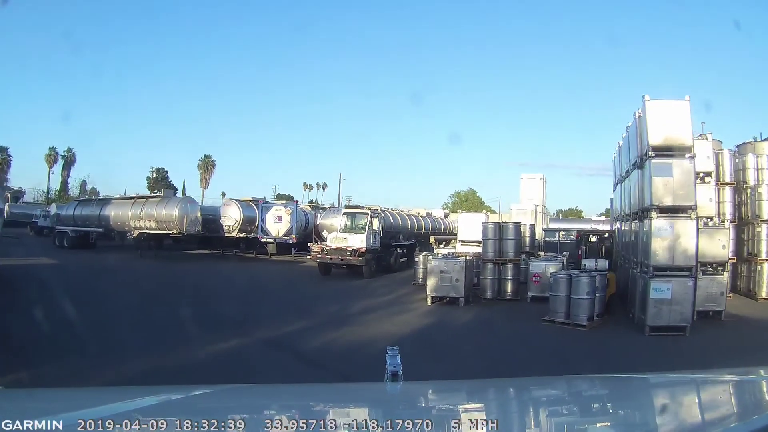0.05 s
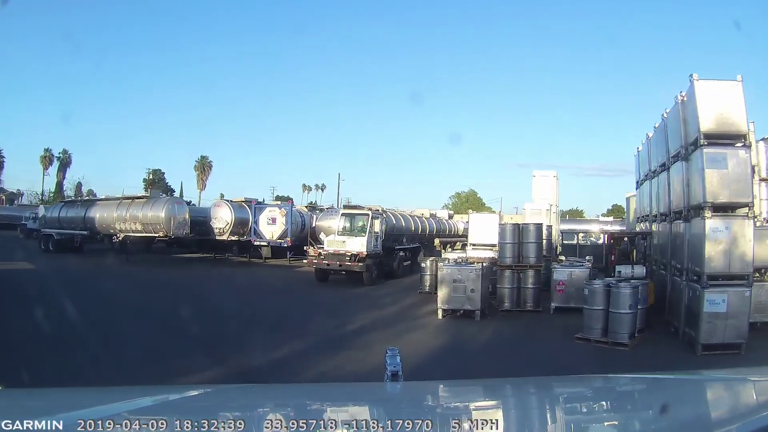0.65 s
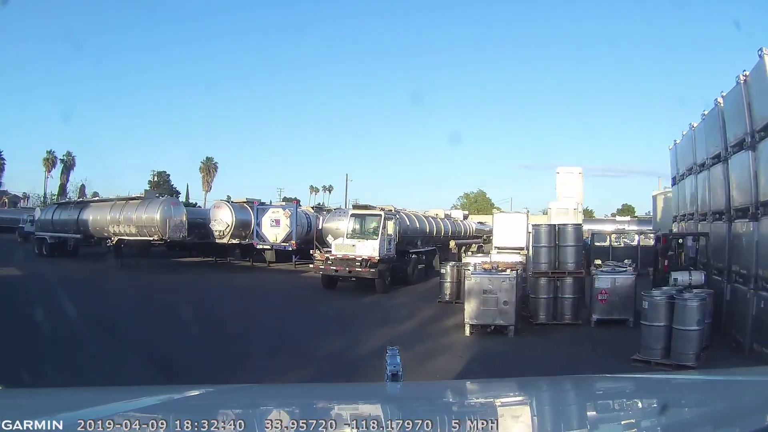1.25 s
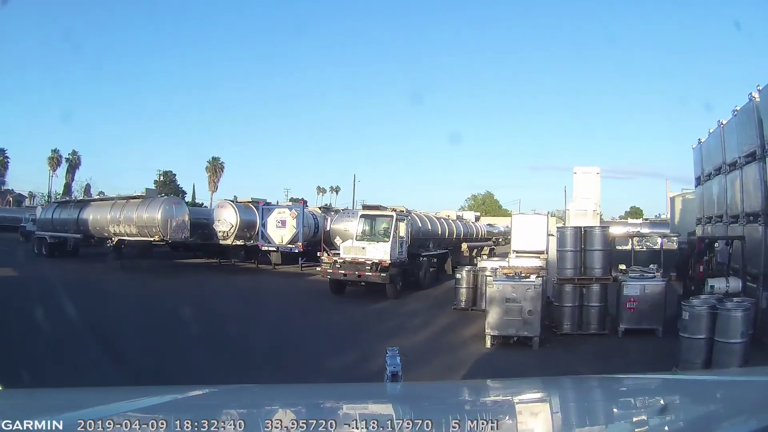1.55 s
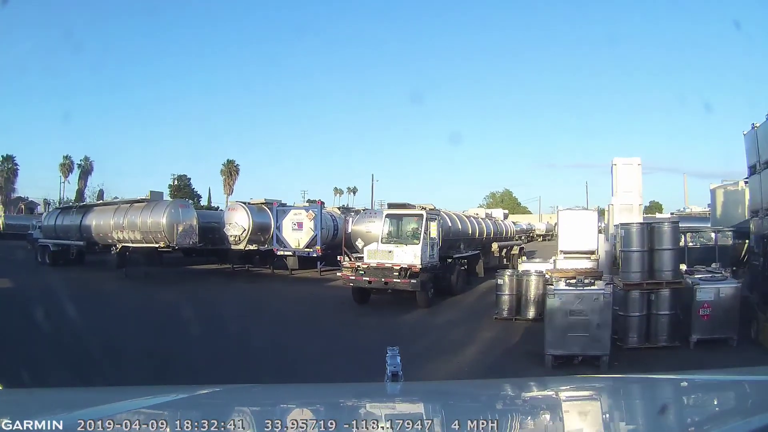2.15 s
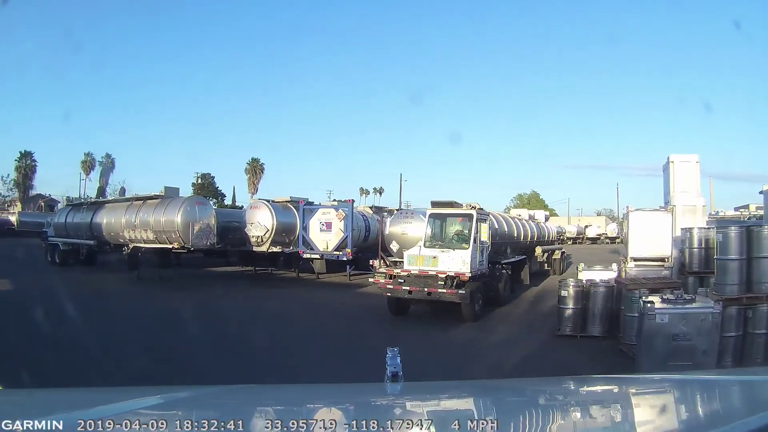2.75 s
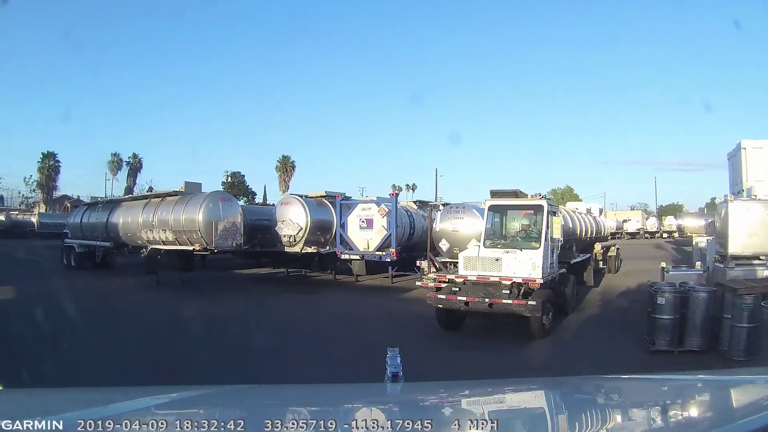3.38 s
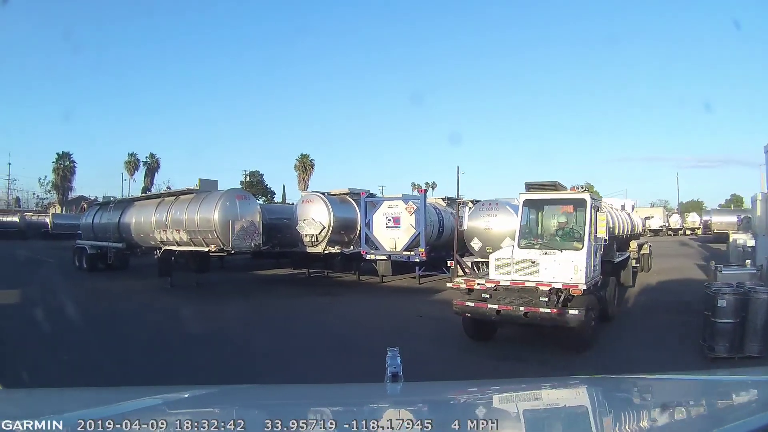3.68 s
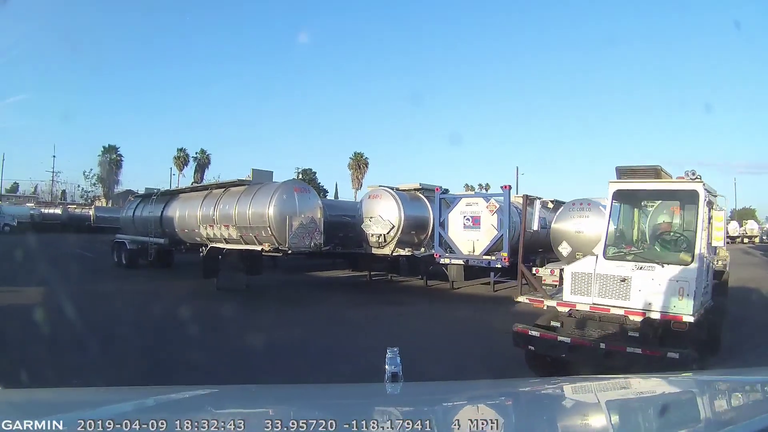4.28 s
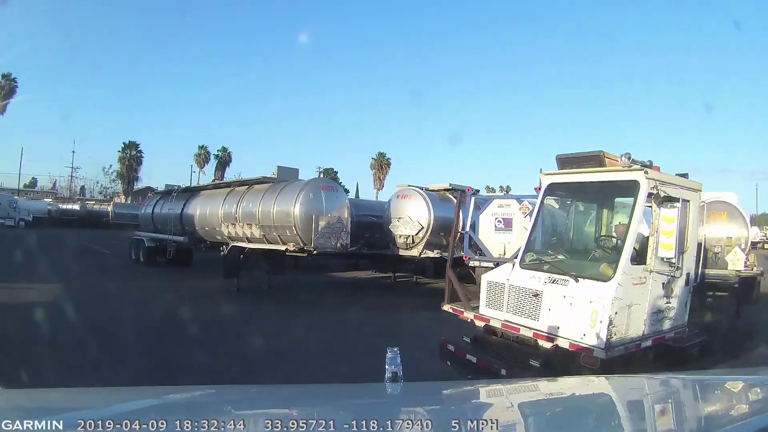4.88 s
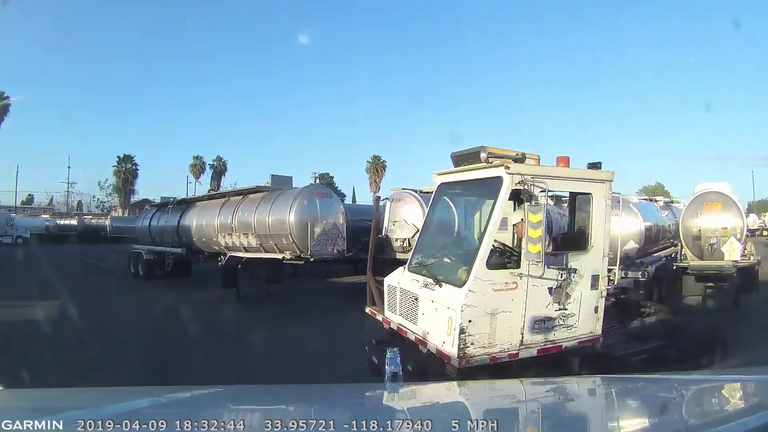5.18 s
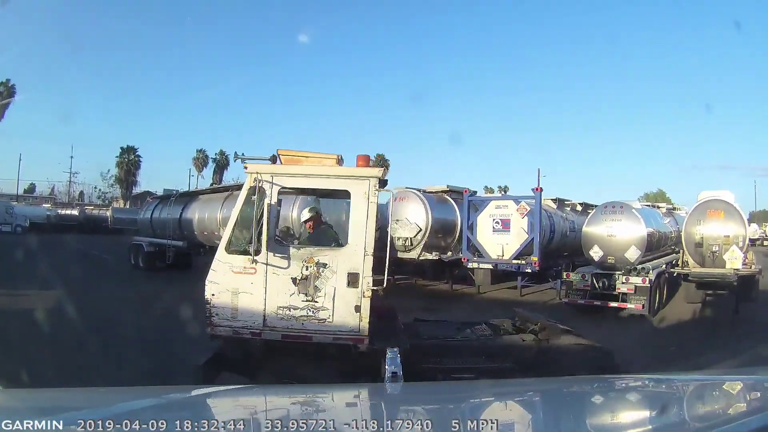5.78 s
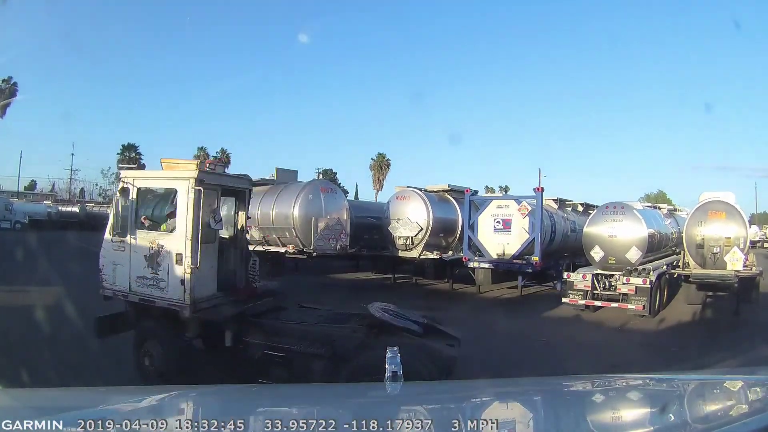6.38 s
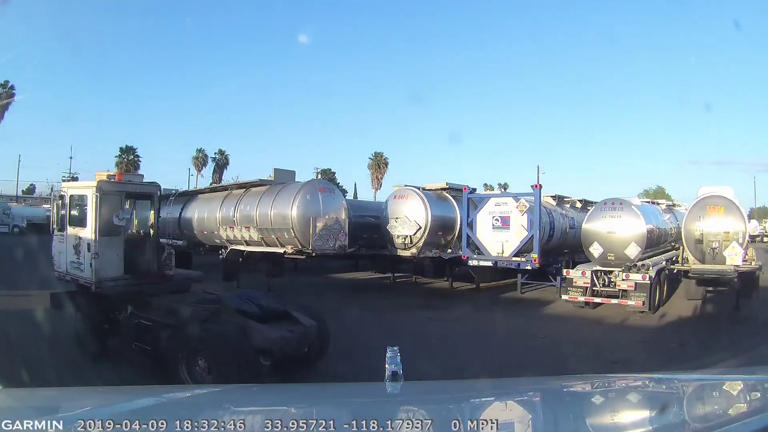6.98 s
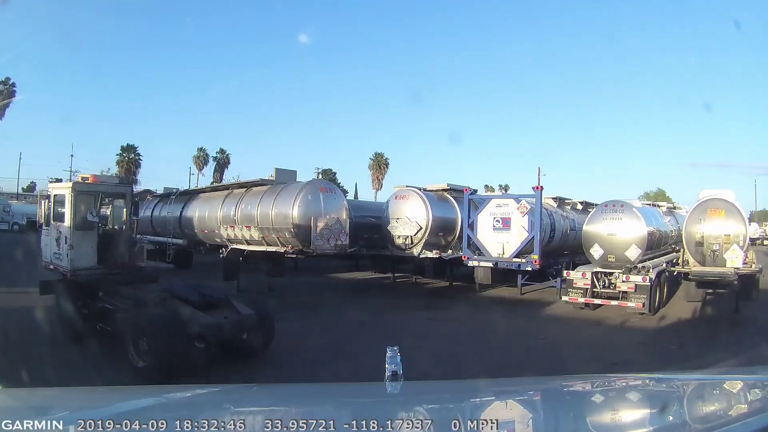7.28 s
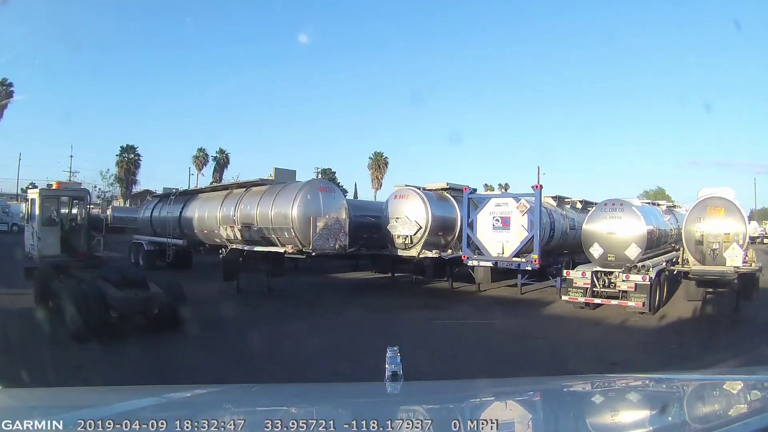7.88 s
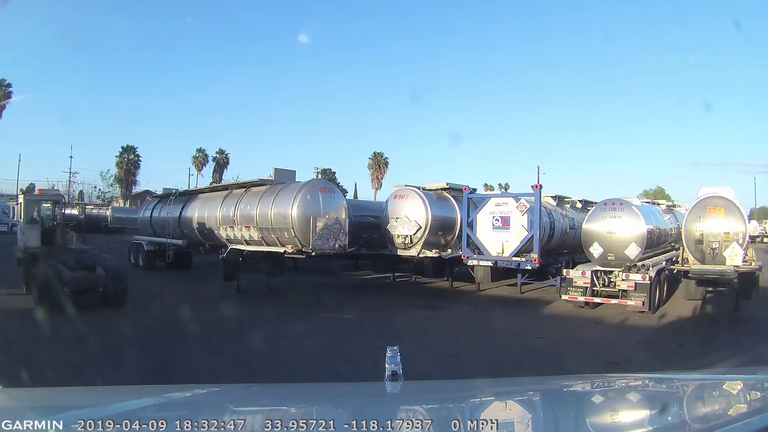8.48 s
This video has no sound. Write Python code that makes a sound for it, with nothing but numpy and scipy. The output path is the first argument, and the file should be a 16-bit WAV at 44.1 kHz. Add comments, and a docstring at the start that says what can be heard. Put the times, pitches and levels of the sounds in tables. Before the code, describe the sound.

Inside an idling diesel truck, a turn signal ticks while the cab rattles and swelling air hiss builds to a hard knock.

```python
"""Inside the cab of a diesel truck rolling at idle through a yard. Engine firings drive the cab's air,
an accessory whines, and the turn signal's relay ticks as its armature strikes and rings the housing.
The cab lurches on its mounts over a dip and its fittings rattle. Air hisses from the suspension valve,
swelling through a hard knock that rings the cab's shell and stopping shortly after it.
A yard tractor's exhaust hums past outside, and two softer thuds follow as the truck stops."""
import sys
import numpy as np
from scipy import signal
from scipy.fft import rfft, irfft, next_fast_len
from scipy.io import wavfile
from scipy.ndimage import map_coordinates

SR = 44100
rng = np.random.default_rng(int(sys.argv[2]) if len(sys.argv) > 2 else 0)


def transcribe(signal):
    """Save signal, clipped to [-1, 1], as a 16-bit WAV file at the path in sys.argv[1]."""
    frames = np.atleast_2d(signal).T
    limited = np.clip(frames, -1, 1)
    pcm = np.round(limited * 32767).astype(np.int16)
    wavfile.write(sys.argv[1], SR, pcm)


N = 381022

# The idling engine. Each row: time in seconds, firing rate in Hz, relative boom level in dB.
ENGINE = [(0, 31.93, -27.5), (1.4, 31.1, -28.5), (2.3, 30.48, -25.5), (2.7, 31.05, -21.5),
          (3.0, 32.35, -23), (3.7, 33.34, -20.5), (3.95, 32.74, -23), (5.3, 33.1, -31), (6.6, 31.84, -24.5),
          (8.64, 32.2, -27)]
# The whine from the engine bay. Each row: time in seconds, level in dB.
WHINE = [(0, -55.5), (1.0, -57.5), (1.5, -64), (5.6, -60), (6.4, -56.5), (8.64, -56.5)]
# The flasher relay. Each row: time it pulls in, time it lets go, both in seconds.
FLASHES = [(0.158, 0.558), (0.9023, 1.304), (1.6826, 2.085), (2.4432, 2.841), (3.1833, 3.586),
           (3.9648, 4.367), (4.7192, 5.121), (5.5005, 5.902), (6.2502, 6.652), (7.0292, 7.431),
           (7.7825, 8.184), (8.53, 8.932)]
# Jolts of loose fittings. Each row: start in seconds, clatter gain in dB, panel gain in dB,
# noise T60 in seconds, clatter cutoff in Hz.
RATTLES = [(0.302, -33.5, -27.5, 0.084, 4540), (0.634, -44, -60, 0.02, 14000),
           (0.908, -38.5, -55, 0.02, 14000), (1.136, -47.5, -60, 0.035, 14000),
           (3.821, -40, -27, 0.11, 1100), (3.934, -38, -44, 0.095, 4000), (3.948, -27, -28, 0.19, 5230),
           (4.057, -35.5, -24, 0.077, 6500), (4.156, -40, -31, 0.1, 5000),
           (4.166, -38.5, -36.5, 0.12, 6500), (4.249, -21.5, -22.5, 0.11, 9200),
           (4.275, -28, -22, 0.3, 4000), (4.302, -12.5, -11.5, 0.044, 11000),
           (4.340, -23.5, -29, 0.12, 6000), (4.434, -47, -35, 0.069, 2010), (4.461, -29, -34, 0.087, 3000),
           (4.526, -35, -29.5, 0.3, 5500), (4.688, -32, -32, 0.047, 3500), (4.789, -31, -25.5, 0.099, 5500),
           (4.836, -32, -31, 0.11, 7000), (4.854, -21.5, -18, 0.049, 7900),
           (4.975, -25.5, -37, 0.092, 11100), (5.040, -33, -30.5, 0.091, 1900),
           (5.079, -34.5, -31, 0.13, 7000), (5.149, -41, -24.5, 0.053, 1200),
           (5.290, -27.5, -24, 0.19, 8550), (5.352, -29, -22.5, 0.15, 1305),
           (5.372, -15.5, -21.5, 0.18, 1520), (5.376, -30, -28, 0.18, 9020),
           (5.442, -27.5, -32, 0.11, 6500), (5.464, -29, -26, 0.22, 1500),
           (5.679, -34.5, -25.5, 0.073, 6140), (5.938, -48, -27, 0.079, 3020),
           (6.284, -43.5, -37, 0.13, 13000), (6.512, -42, -31.5, 0.12, 6000), (6.622, -39, -39, 0.25, 5000)]
# The yard tractor's exhaust note. Each row: loudest moment in seconds, pitch in Hz, level in dB,
# time to half amplitude in seconds.
TRACTOR_SWELLS = [(3.35, 79.1, -38, 0.27), (6.26, 80.7, -35, 0.2)]
# Lurches of the cab. Each row: start in seconds, length in seconds, sway gain in dB, rumble level in dB.
LURCHES = [(3.811, 0.19, -33, -45), (4.208, 0.12, -14.5, -32), (4.414, 0.094, -13.5, -43),
           (4.554, 0.33, -21, -39.5), (5.181, 0.37, -43, -38)]
# Heavy blows on the cab. Each row: start in seconds, boom gain in dB, trim gain in dB,
# clatter T60 in seconds, boom cutoff in Hz.
KNOCKS = [(5.179, -13.5, -24.5, 0.17, 805), (5.187, -11.5, -15.5, 0.1, 2200),
          (5.201, -14.5, -28.5, 0.3, 1600), (5.239, -23.5, -30, 0.08, 600), (6.659, -13, -40.5, 0.16, 170),
          (7.417, -16, -34.5, 0.1, 101)]

# Resonances of the cab's air and panels. Each row: centre in Hz, width in Hz, lift in dB.
CAB_MODES = [(94, 9.2, 0.5), (193, 10, 1), (233, 33, 1.5), (371, 33, 3), (414, 19, 3), (518, 22, -2),
             (518, 23, 2), (625, 16, -3.5), (645, 20, 1), (836, 52, 2.5), (888, 30, -3.5), (1005, 49, 0.5),
             (1163, 44, 1.5), (1354, 26, 2), (1620, 27, -0.5), (1637, 14, 7.5), (1746, 21, 8),
             (1920, 11, 4), (1952, 15, 7), (2060, 23, 1), (2200, 50, -1), (3130, 36, -1), (3560, 590, 5),
             (4360, 250, -4), (4750, 140, 2.5), (6220, 150, 2)]
# The cab's reverberation. Each row: frequency in Hz, T60 (time to fall 60 dB) in seconds.
CAB_T60 = [(100, 0.36), (1000, 0.12), (10000, 0.11)]

# Modes of struck parts. Each row: frequency in Hz, relative level in dB, T60 in seconds.
TICK_MODES = [(1230, -8, .05), (3000, -13, .04), (3400, -12, .04), (3490, -4, .05), (3570, -4, .05),
              (3660, -2, .06), (3790, -1, .06), (3875, -2, .055), (4090, 0, .05), (4200, -5, .04),
              (4310, -3, .05), (6180, -16, .05)]  # relay pulling in
TOCK_MODES = [(2960, -1, .075), (3060, -12, .04), (3450, -9, .05), (3560, -3, .06), (3660, -3, .06),
              (3795, 0, .08), (3875, -5, .06), (4200, -12, .05), (5050, -14, .04)]  # relay letting go
FITTING_MODES = [(560, 3, .09), (853, 1, .09), (1150, 4, .09), (1250, 5, .075), (1560, -3, .08),
                 (2365, 2, .1), (2680, 1, .08), (3130, 0, .086), (3630, 0, .078), (4190, -1, .06),
                 (4720, -4, .06), (6230, -2, .06), (7700, 5, .045), (8200, 1, .04), (8900, -1, .04),
                 (10150, -4, .04)]
SHELL_MODES = [(100, 1, .19), (135, -1, .16), (176, 2, .19), (211, -3, .2), (245, -5, .18), (285, -6, .18),
               (328, -2, .18), (355, 0, .27), (410, -9, .16), (465, -3, .19), (518, -3, .23),
               (585, -11, .16), (690, -11, .2), (845, -8, .35), (945, -8, .4), (1055, -8, .45),
               (1240, -11, .3)]

# Noise spectra. Each row: frequency in Hz, relative spectral density in dB.
DIESEL_COLOUR = [(20, -19), (42, -2), (60, -13), (95, -12.5), (240, -15.5), (420, -21.5), (665, -24.5),
                 (1040, -32.5), (1750, -37), (2400, -42.5), (3600, -46), (4400, -47.5), (9500, -52.5),
                 (14000, -67.5)]
INJECTOR_COLOUR = [(1000, -23), (1600, -1.5), (1800, 0), (2000, -0.5), (2300, -16), (3100, -11),
                   (3400, -4.5), (3800, -17), (7000, -37)]
HOUSING_COLOUR = [(300, -6), (1200, 5), (2400, -2), (3300, 4), (3750, 11), (4350, 1), (4600, -11),
                  (6200, -19), (14000, -42)]  # the relay's case
CLATTER_COLOUR = [(600, -2.5), (1500, 2.5), (2400, 1.5), (3700, 3), (5000, 2.5), (8000, 1), (11500, 0),
                  (14500, -4.5)]  # fittings and trim
PANEL_COLOUR = [(60, -36), (130, -22), (350, 2.5), (600, 0), (1200, -6), (1800, -17), (3000, -26.5),
                (6000, -36.5)]  # the panel holding a fitting
GROWL_COLOUR = [(300, -30), (720, -19), (810, 7), (870, -3), (1000, -3), (1400, -10.5), (2000, -41.5)]  # the tractor's engine
PUFF_COLOUR = [(1500, -40), (3000, 3), (6000, 3.5), (10000, 0), (14500, -2)]
VENT_COLOUR = [(500, 9.5), (2000, 2.5), (3600, 3.5), (5000, 4), (8000, 1.5), (11500, -1.5), (14500, -15)]
SHELL_COLOUR = [(50, -38), (90, 3.5), (190, 2), (360, 5), (560, -7.5), (1050, -3.5), (1500, -19.5),
                (3000, -49), (8000, -60)]
MOUNT_COLOUR = [(8, -32), (18, -14), (29, -3), (38, 1), (55, -14.5), (150, -17), (500, -31),
                (1500, -43), (5000, -95)]
RUMBLE_COLOUR = [(40, -27), (150, 2), (450, 4), (800, -9.5), (1200, -4), (2000, -24), (6000, -28)]


def amp(db):
    """Amplitude ratio of a level in decibels."""
    return 10 ** (np.asarray(db) / 20)


def unit(x):
    """Normalisation to an rms of 1."""
    return x / np.sqrt(np.mean(x ** 2) + 1e-20)


def along(points, hz):
    """Interpolation of (Hz, value) points on a logarithmic frequency axis."""
    f, v = np.transpose(points)
    return np.interp(np.log(hz + 1), np.log(f + 1), v)


def curves(rows):
    """Linear interpolation of each column after the time, one value per sample."""
    s, *columns = np.transpose(rows)
    return [np.interp(np.arange(N) / SR, s, column) for column in columns]


def wobble(rate):
    """Smooth random modulation with rate knots a second."""
    return map_coordinates(rng.standard_normal(int(N * rate / SR) + 4), [np.arange(N) * rate / SR])


def decay(t, t60):
    """Exponential damping: 60 dB in t60 seconds."""
    return np.exp(-np.log(1000) * t / t60)


def gate(start, length, attack, release):
    """Exponential rise from start and fall after length; attack and release are time constants."""
    t = np.maximum(np.arange(N) / SR - start, 0)
    return (1 - np.exp(-t / attack)) * np.exp(-np.maximum(t - length, 0) / release)


def swell(s, fade):
    """Gaussian envelope, greatest at s and at half amplitude fade seconds either side."""
    return 0.5 ** (((np.arange(N) / SR - s) / fade) ** 2)


def resonance(hz, centre, width):
    """Lorentzian curve, with its full width taken at half height."""
    return 1 / (1 + (2 * (hz - centre) / width) ** 2)


def filtered(x, response):
    """Filtering as multiplication of the spectrum by a frequency response."""
    m = next_fast_len(len(x) + 8192)
    return irfft(rfft(x, m) * response(np.fft.rfftfreq(m, 1 / SR)), m)[:len(x)]


def dulled(x, hz):
    """Low-pass filtering: a softer contact excites less treble."""
    return signal.lfilter(*signal.butter(2, min(hz, SR / 3), fs=SR), x)


def noise(colour, size=N):
    """Source and filter: noise of the given spectrum, shaped by the cab's resonances; rms 1."""
    m = next_fast_len(size)
    hz = np.fft.rfftfreq(m, 1 / SR)
    lift_db = sum(db * resonance(hz, centre, width) for centre, width, db in CAB_MODES)
    spectrum = rfft(rng.standard_normal(m)) * amp(along(colour, hz) + lift_db)
    return unit(irfft(spectrum, m)[:size])


def burst(colour, t60, attack, size=4096):
    """Modal overlap: densely packed modes, once struck, die away as noise."""
    t = np.arange(size) / SR
    return noise(colour, size) * decay(t, t60) * (1 - np.exp(-t / attack))


def ring(modes, spread_db, detune, scatter=0, size=4096):
    """Superposed damped modes, varied in level and pitch, up to scatter cycles out of step; peak 1."""
    t = np.arange(size) / SR
    chance = rng.standard_normal((len(modes), 2))
    lags = scatter * rng.random(len(modes))
    x = np.zeros(size)
    for (hz, db, t60), (strength, pitch), lag in zip(modes, chance, lags):
        cycles = hz * (1 + detune * pitch) * t - lag
        x += amp(db + spread_db * strength) * decay(t, t60) * np.sin(2 * np.pi * cycles)
    return x / np.abs(x).max()


def chatter(x, depth_db, rate):
    """Intermittent contact: loose parts touch and part, breaking a clatter into uneven grains."""
    knots = rng.standard_normal(len(x) // 8)
    grain = amp(depth_db * map_coordinates(knots, [np.arange(len(x)) * rate / SR]))
    return x * unit(grain)


def add(track, s, sound):
    """Superposition of a sound on the track at s seconds."""
    part = track[max(round(s * SR), 0):][:len(sound)]
    part += sound[:len(part)]


def engine():
    """Periodic forcing: each firing pushes the cab's air and sends clatter through the firewall."""
    firing_hz, boom_db = curves(ENGINE)
    load_db = boom_db + 28  # boom above idle; load lifts the second harmonic and the clatter
    phase = 2 * np.pi * np.cumsum(firing_hz) / SR
    second = amp(-21 + 1.3 * load_db + 6.1 * wobble(3.2)) * np.sin(2 * phase)
    third = amp(-26.5 + 1.1 * wobble(2.8)) * np.cos(3 * phase)
    boom = np.sqrt(2) * amp(boom_db - 5 + 0.97 * wobble(10)) * (np.sin(phase) + second + third)
    throb = amp(0.81 * np.sin(phase) + 0.62 * wobble(25))
    return boom + amp(-34 + 0.27 * load_db) * throb * noise(DIESEL_COLOUR)


def injectors():
    """An impact train: every firing adds a faint, damped metallic clack of uneven strength."""
    firing_hz, _ = curves(ENGINE)
    cycles = np.cumsum(firing_hz) / SR
    strengths = amp(2 * rng.standard_normal(1024))
    since_firing_s = (cycles % 1) / firing_hz
    clacks = strengths[cycles.astype(int)] * decay(since_firing_s, t60=0.19)
    return amp(-62) * unit(clacks) * noise(INJECTOR_COLOUR)


def whine():
    """Narrow-band noise is heard as an unsteady tone: a belt-driven accessory sings."""
    whine_db, = curves(WHINE)
    band = filtered(rng.standard_normal(N), lambda hz: resonance(hz, centre=1048, width=24))
    return amp(whine_db) * unit(band)


def relay(times, modes, db, snap_db, scrape_lead_s, scrape_db, buzz_db):
    """Impact excitation: the armature scrapes, lands with a snap, rings the housing and buzzes to rest."""
    snap_hz, snap_peak_s, housing_attack_s = 3790, 0.0014, 0.0013
    out, t = np.zeros(N), np.arange(4096) / SR
    snap = (t / snap_peak_s * np.exp(1 - t / snap_peak_s)) ** 3 * np.sin(2 * np.pi * snap_hz * t)
    for s in times:
        housing = ring(modes, spread_db=1.5, detune=0.0032, scatter=1)
        housing *= 1 - np.exp(-t / housing_attack_s)
        scrape = amp(scrape_db) * burst(HOUSING_COLOUR, t60=0.043, attack=0.00042)
        buzz = amp(buzz_db) * burst(HOUSING_COLOUR, t60=0.1, attack=0.00081)
        add(out, s - scrape_lead_s, amp(db) * scrape)
        add(out, s, amp(db) * (housing + amp(snap_db) * snap + buzz))
    return out


def flasher():
    """Each stroke excites its own modes: a bright tick for lamps on, a softer, lower tock for off."""
    on, off = np.transpose(FLASHES)
    ticks = relay(on, TICK_MODES, db=-30.5, snap_db=2, scrape_lead_s=0.0015, scrape_db=-17, buzz_db=-8)
    tocks = relay(off, TOCK_MODES, db=-32, snap_db=-10, scrape_lead_s=0.003, scrape_db=-14, buzz_db=-11)
    return ticks + tocks


def rattles(jolts):
    """Structural coupling: a loose fitting clatters, clinks and shakes the panel that holds it."""
    contact_cycles = 5.5  # rise time in periods of the cutoff, so dull contacts start softly
    out, size = np.zeros(N), 8192
    for s, clatter_db, panel_db, t60, cutoff_hz in jolts:
        contact = burst(CLATTER_COLOUR, t60, attack=contact_cycles / cutoff_hz, size=size)
        clatter = chatter(contact, depth_db=2, rate=424)
        clink = amp(2.5) * ring(FITTING_MODES, spread_db=4.5, detune=0.0033, size=size)
        add(out, s, amp(clatter_db) * dulled(clatter + clink, cutoff_hz))
        add(out, s, amp(panel_db) * burst(PANEL_COLOUR, t60, attack=0.0027, size=size))
    return out


def tractor():
    """Transmission through glass: a low exhaust note swells twice; the engine growls as it pulls away."""
    exhaust = np.zeros(N)
    for s, hz, db, fade in TRACTOR_SWELLS:
        phase = 2 * np.pi * np.cumsum(hz * (1 + 0.008 * wobble(5))) / SR
        note = np.sin(phase) + amp(-12.5) * np.sin(2 * phase)
        exhaust += np.sqrt(2) * swell(s, fade) * amp(db + wobble(7.2)) * note
    growl = amp(-50) * swell(3.1, fade=0.82) * noise(GROWL_COLOUR)
    return exhaust + growl


def valve(opens, shuts, db, growth_db):
    """Envelope of a valve's flow: it grows by growth_db to reach db, then is cut off."""
    to_go = np.clip((shuts - np.arange(N) / SR) / (shuts - opens), 0, 1)
    return amp(db - growth_db * to_go) * gate(opens, shuts - opens, attack=0.04, release=0.055)


def suspension_air():
    """Flow noise: the levelling valve gives one short puff, then a long vent with a seep around it."""
    opens, shuts, seep_margin_s = 4.25, 5.49, 0.42
    puff = valve(opens=2.575, shuts=2.775, db=-46.5, growth_db=2)
    vent = valve(opens, shuts, db=-36.5, growth_db=12.5)
    seep = valve(opens - seep_margin_s, shuts + seep_margin_s, db=-54, growth_db=0)
    return puff * noise(PUFF_COLOUR) + np.hypot(vent, seep) * amp(wobble(40)) * noise(VENT_COLOUR)


def sway():
    """A mass on springs: at each lurch the cab swings on its mounts and its panels rumble along."""
    mount_hz, wander_hz = 28.1, 3.37
    heave, rumble = np.zeros((2, N))
    for s, length, sway_db, rumble_db in LURCHES:
        envelope = gate(s, length, attack=0.025, release=0.054)
        heave += amp(sway_db) * envelope
        rumble += amp(rumble_db) * envelope
    swing = np.sin(2 * np.pi * np.cumsum(mount_hz + wander_hz * wobble(6.2)) / SR)
    mounts = amp(-6) * noise(MOUNT_COLOUR)
    return heave * (swing + mounts) + rumble * noise(RUMBLE_COLOUR)


def jiggles():
    """Random excitation: each lurch jolts the fittings at irregular moments; rows as in RATTLES."""
    per_second, spread_db, t60, cutoff_hz = 14, 8, 0.11, 4500
    jolts = []
    for s, length, _, rumble_db in LURCHES:
        for k, (when, softness) in enumerate(rng.random((32, 2))):
            delay = 0.025 + (k + when) / per_second
            db = rumble_db - spread_db * (2 * softness - 1)
            if delay < length:
                jolts.append((s + delay, db + 1, db + 2, t60, cutoff_hz))
    return jolts


def knocks():
    """Free vibration: a heavy blow rings the cab's shell and leaves the trim clattering and buzzing."""
    trim_cutoff_ratio = 47  # the trim reaches far higher than the boom
    out, size = np.zeros(N), 12288
    for s, boom_db, trim_db, t60, cutoff_hz in KNOCKS:
        shell = amp(8) * ring(SHELL_MODES, spread_db=2, detune=0.0037, size=size)
        thud = amp(2) * burst(SHELL_COLOUR, 1.07 * t60, attack=0.0018, size=size)
        contact = burst(CLATTER_COLOUR, t60, attack=0.0028, size=size)
        clatter = amp(5.5) * chatter(contact, depth_db=1, rate=380)
        buzz = amp(-16.5) * burst(CLATTER_COLOUR, t60=0.32, attack=0.016, size=size)
        add(out, s, amp(boom_db) * dulled(shell + thud, cutoff_hz))
        add(out, s, amp(trim_db) * dulled(clatter + buzz, trim_cutoff_ratio * cutoff_hz))
    return out


def cab_reverb(x):
    """Reverberation: reflections in the small glazed cab die quickly, the bass lasting longest."""
    hz, t, spectra = signal.stft(rng.standard_normal(SR // 2), SR, nperseg=256)
    _, tail = signal.istft(spectra * decay(t, along(CAB_T60, hz)[:, None]), SR, nperseg=256)
    response = np.pad(tail, (130, 0)) / np.linalg.norm(tail)  # reflections begin after 3 ms
    return signal.fftconvolve(x, response)[:N]


def scene():
    """Superposition at the windscreen: sustained sounds, impacts and the impacts' reverberation."""
    sustained = engine() + injectors() + whine() + sway() + tractor() + suspension_air()
    impacts = flasher() + knocks() + rattles(RATTLES + jiggles())
    return (sustained + impacts + amp(-11) * cab_reverb(impacts))[None]


def record(dry):
    """Soft saturation rounds off peaks near full scale, and a band limit removes the highest treble."""
    ceiling, top_hz = 0.92, 14850
    rounded = dry[0] / (1 + np.abs(dry[0] / ceiling) ** 6) ** (1 / 6)
    return filtered(rounded, lambda hz: hz < top_hz)[None]


dry = scene()
out = record(dry)
transcribe(out)
```